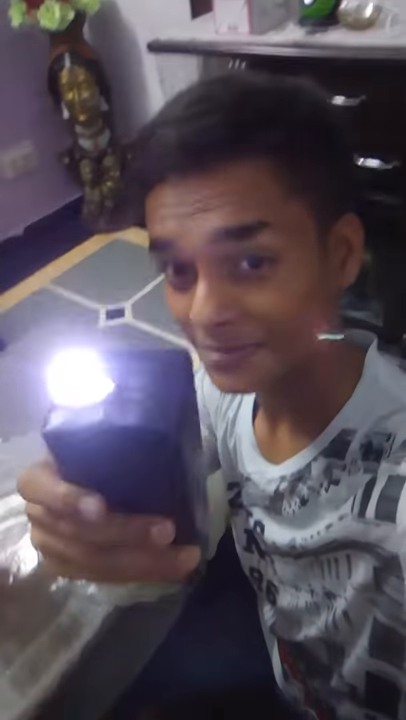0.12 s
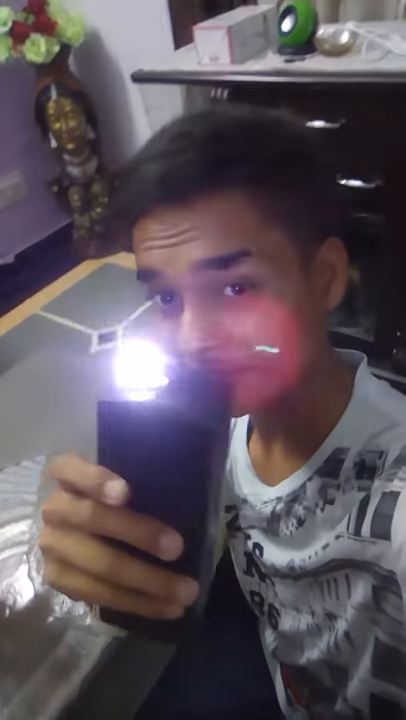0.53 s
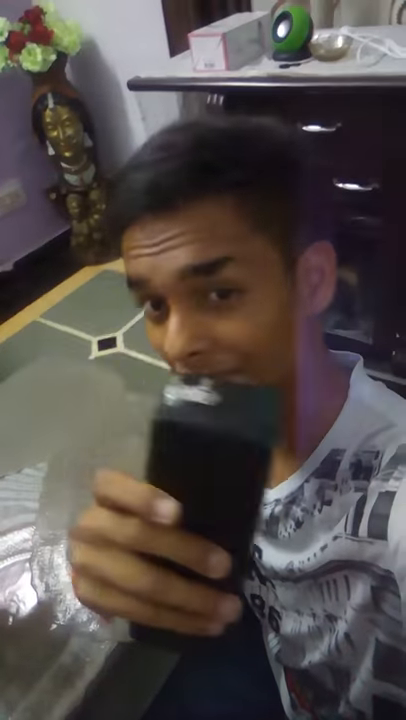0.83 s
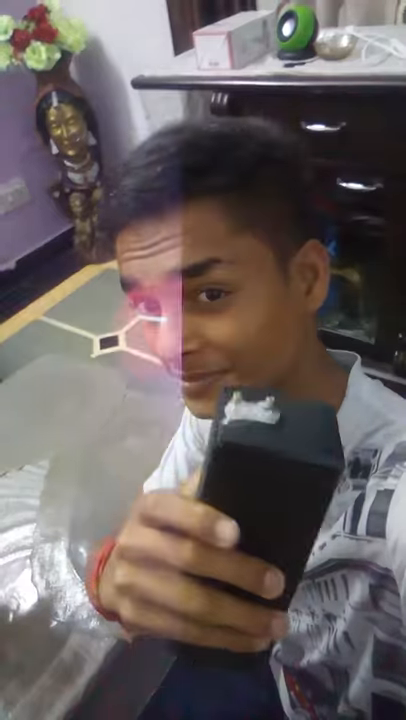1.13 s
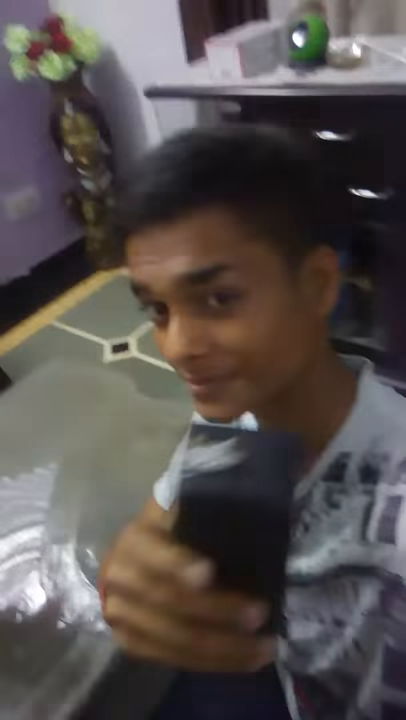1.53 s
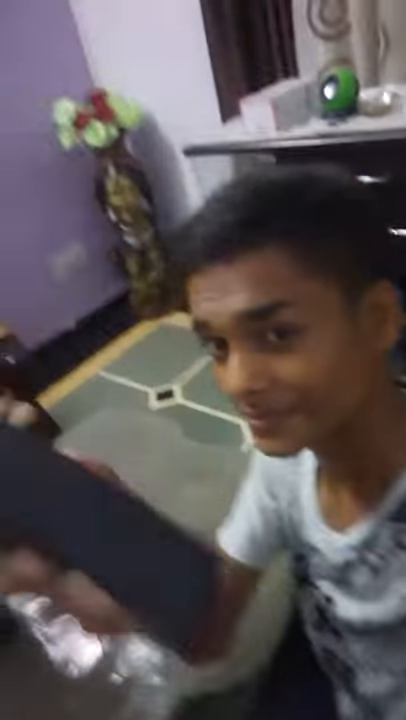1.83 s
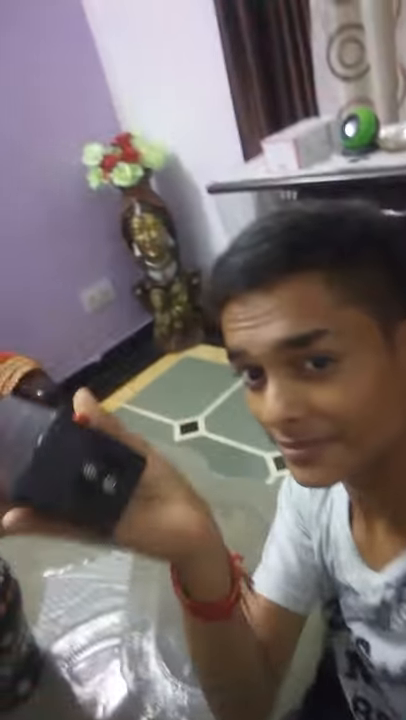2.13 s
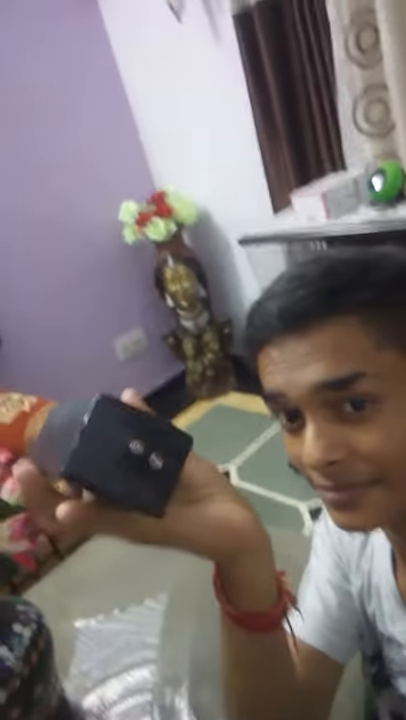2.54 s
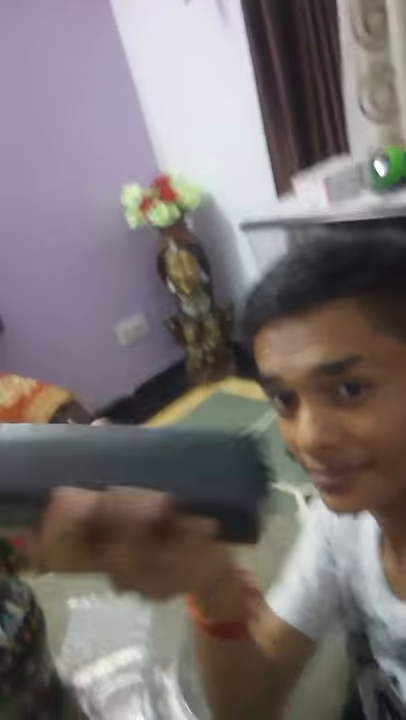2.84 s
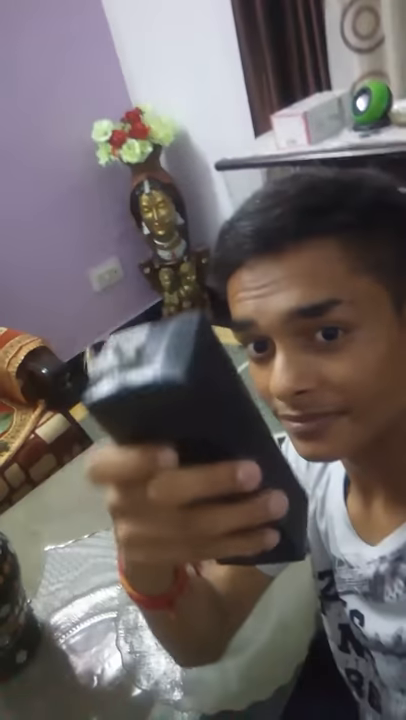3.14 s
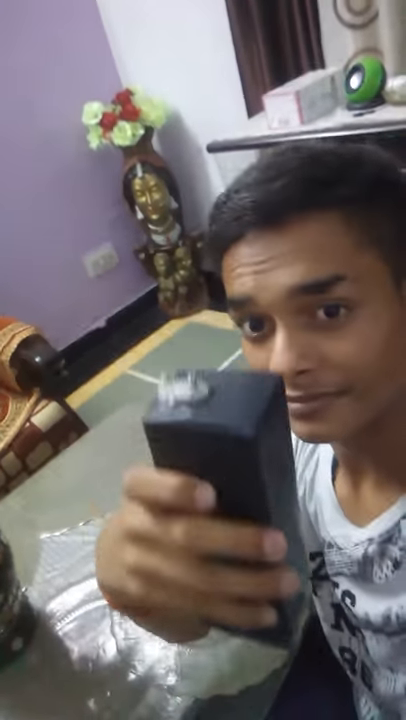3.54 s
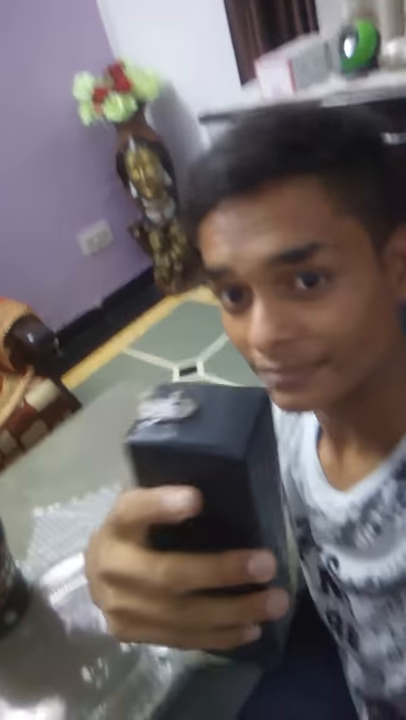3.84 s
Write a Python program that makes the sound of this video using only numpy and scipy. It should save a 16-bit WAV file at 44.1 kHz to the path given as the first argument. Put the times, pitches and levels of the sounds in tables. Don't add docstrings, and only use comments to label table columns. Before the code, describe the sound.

A stun device's electric sparks crack sharply from 0 to about 2.8 s, roughly eleven per second, uneven in strength. Very close to a stereo phone microphone, they overload it with blunt thumps and bright snaps, echoing off hard walls. The room dies away; plastic knocks and loose switch clicks come at 3.1, 3.2 and 3.3-3.4 s, then a faint rub near 3.8 s over quiet room noise.

```python
import sys
import numpy as np
from scipy import signal
from scipy.fft import rfft, irfft, next_fast_len
from scipy.io import wavfile
from scipy.ndimage import uniform_filter1d, minimum_filter1d

SR = 44100
rng = np.random.default_rng(int(sys.argv[2]) if len(sys.argv) > 2 else 0)


def to_linear_factor(level_db):
    exponent = np.asarray(level_db, float) / 20
    return 10 ** exponent


def int16_out(signal):
    q = np.round(np.clip(np.atleast_2d(signal).T, -1, 1) * 32767)
    wavfile.write(sys.argv[1], SR, q.astype(np.int16))


N = 176400

# start in seconds, level in dB, left microphone's jolt at the crack, jolt at
SPARKS_EARLY = [(-0.008, 2, 0.3, -0.19, -0.37), (0.0718, 7, 0.023, -1.53, -0.44),
                (0.1495, 4, 0.31, -0.67, 0.4), (0.2303, 4, -0.065, 0.062, -0.22),
                (0.3142, 5, 0.035, -0.62, 0.4), (0.3985, -2.5, 0.21, -0.47, 0.19),
                (0.4822, -2, 0.53, -0.75, 0.18), (0.5637, 0, 0.31, -0.34, -0.029),
                (0.6476, 3.5, 0.51, -0.44, 0.036), (0.7298, -1, 0.38, -0.47, 0.21),
                (0.8111, 2, 0.35, -1.34, 0.63), (0.89, -2.5, 0.37, -1, -1),
                (0.9688, 0.5, 0.42, -0.49, 0.97), (1.052, -3.5, 0.11, -0.34, 0.11),
                (1.1376, 0.5, 0.41, -0.65, 0.84), (1.227, 5.5, 0.54, -1.6, 0.9),
                (1.3203, 3.5, -0.19, -0.86, 0.98)]
SPARKS_LATE = [(1.411, 5.5, 0.073, -1.14, 1), (1.499, 3.5, -0.31, -1.33, 0.61),
               (1.5956, -3, 0.21, -0.69, 0.31), (1.7037, 6, 0.12, 0.21, -1.13),
               (1.7919, 3.5, 0.083, -0.83, -0.31), (1.88, 0, -0.55, -1, -0.23),
               (1.9781, 3.5, -0.23, -1.12, -0.21), (2.067, -1.5, 0.32, -0.88, 0.2),
               (2.1632, 0, -0.22, -0.83, 0.011), (2.2578, -3.5, 0.2, -0.55, -0.078),
               (2.348, -5.5, 0.063, -0.62, 0.018), (2.447, -0.5, -0.23, -0.21, 0.19),
               (2.5363, 2, -0.074, -0.51, -0.3), (2.6258, -1.5, -0.028, -0.35, -0.013),
               (2.7198, -0.5, -0.073, -0.17, -0.049), (2.8337, -0.5, -0.036, -0.55, -0.084)]
# time in seconds, echo delay in ms, crack at the right port in dB.
NEAR_WALL = [(0, 10.5, 0), (.66, 10.34, -1.5), (0.718, 8.7, 1), (1.498, 8.4, 2.5), (1.702, 8.3, -2),
             (1.89, 9.9, -9), (1.968, 8.6, -5), (2.07, 8.6, 1.5), (2.3, 8.9, 0.5), (2.6, 8.4, 1),
             (2.84, 9.4, 2.5)]
# delay in seconds, left level in dB, right level in dB.
SHARP_ECHOES = [
    (.006, -14, -5),
    (.0105, -13.5, -6),
    (.016, -3, -12.5),
]
# time in seconds, jolt as share of full scale.
EXTRA_JOLTS = [(.3147, -0.75), (.3153, 0.23), (.3996, -0.29), (1.8011, 0.64), (1.9790, 0.36),
               (2.8341, 0.34), (2.8349, -0.12), (1.3213, -0.34), (1.3217, 0.6), (2.4625, -0.15),
               (2.7353, -0.46), (1.6093, 0.48), (.0861, 0.69), (.1638, 0.89), (.2445, 0.4), (.3283, 0.47),
               (2.0665, -.6), (2.0669, 1.26), (2.0684, -1), (2.0746, 0.41), (2.0816, -0.38), (.0739, 0.6),
               (.8128, 0.34), (.8917, 0.51), (1.0537, -0.25), (1.4106, -0.94), (1.499, -0.74),
               (1.7139, 1.45), (1.7912, -0.54), (1.8813, 0.17), (1.8827, -0.2), (2.5358, -0.14),
               (2.5363, 0.44), (2.5368, -0.45), (2.6251, -0.3), (2.6259, -0.039), (2.7201, -0.53),
               (2.7209, 0.39), (.4128, 0.42), (.5723, -0.3), (.5777, 0.29), (1.4237, -.4), (2.1714, 0.4),
               (.8215, -1.1), (.8218, 1.1), (.8222, -1.2), (.8226, 1.4)]
# time in seconds, jolt as share of full scale.
RIGHT_JOLTS = [(0.1504, -0.08), (0.2309, -0.44), (0.314, -0.12), (0.4001, -0.12), (0.482, -0.14),
               (0.5647, -0.12), (0.648, -0.076), (0.7308, -0.077), (0.8105, 0.055), (0.888, -0.095),
               (0.9683, 0.14), (1.0524, 0.18), (1.1381, 0.1), (1.2277, -0.26), (1.3212, 0.2), (1.41, -0.17),
               (1.4989, -0.39), (1.5951, -0.32), (1.7037, 0.36), (1.7887, 0.028), (2.8332, 0.041)]
# frequency in Hz, level in dB.
SPARK_COLOUR = [(150, -10.5), (800, -14.5), (1800, -12.5), (4700, -4.5), (6600, -2), (7800, -9.5),
                (13500, -10), (15000, -1.5)]
# frequency in Hz, left over right in dB.
LEFT_OVER_RIGHT = [(100, 22.5), (700, 8), (2400, 2), (8000, 1.5), (15000, 5.5)]
# frequency in Hz, time to fall 60 dB in seconds.
ROOM_T60 = [(300, 0.27), (1000, 0.31), (3000, 0.5), (7000, 0.43), (15000, 0.34)]
# start in seconds, peak in dB, left over right in dB, room in dB, strongest ring in Hz.
KNOCKS = [(3.0802, -6, 7, -21.5, 2700), (3.0807, -13, 19, -40, 5370), (3.2001, -23.5, -9, -9.5, 2010),
          (3.3338, -14.5, -3.5, -16.5, 3400), (3.392, -17, 13, -42, 1750), (3.3949, -21, 11, -41, 716),
          (3.394, -4, 6, -20.5, 3390), (3.3949, -6.5, 19, -45, 3280), (3.44, -45, 5, 15, 3400),
          (3.48, -47, 5, 6, 3400), (3.732, -42, 0, -19.5, 2000)]
CLICKS = [(3.1967, -14.5, 25, -27.5, 5510), (3.197, -10.5, 25, -31, 3820), (3.2078, -20, 25, -37, 5530),
          (3.2105, -11.5, 25, -24.5, 3800), (3.21, -17, 25, -43, 5460), (3.3212, -42, 20, -40, 5500),
          (3.3236, -23.5, 20, -26, 4830), (3.3357, -19, 25, -42, 5470), (3.3388, -25, 10, -39, 5500),
          (3.3431, -12.5, 25, -32, 5700), (3.3454, -16, 25, -42, 5600), (3.35, -25, 10, -41, 4500),
          (3.3530, -14, 25, -29, 5540), (3.4035, -24, 16, -40, 4800)]
# centre in Hz, width in Hz, level in dB.
CASE = [(716, 185, -11), (1690, 540, 0), (3400, 830, 3), (5410, 700, -2), (6400, 520, 1),
        (11650, 2500, -15.5), (14660, 740, 1)]
# centre in Hz, width in Hz, level in dB.
SWITCH = [(2540, 1200, -5), (3800, 600, -3), (5400, 280, -1), (7000, 360, -8), (11200, 1700, -27),
          (15300, 630, -10)]
# frequency in Hz, level in dB.
KNOCK_ROOM = [(300, -31), (700, -10.5), (1600, -7), (3500, -2.5), (6500, -6.5), (8000, -19.5),
              (13500, -17.5), (15000, -8)]
# time in seconds, level in dB.
RUB_SWELL = [
    (3.70, -91.5),
    (3.765, -70),
    (3.791, -63),
    (3.825, -64.5),
    (3.845, -66),
    (3.95, -82),
]
# frequency in Hz, level in dB.
RUB_COLOUR = [(200, -15), (820, -7), (1500, -10), (3000, -10), (6000, -8), (9000, -23.5), (15000, -11.5)]
# centre in Hz, width in Hz, level over the swell in dB.
HUM = [(328, 43, -82.5), (815, 22, -75.5)]
# frequency in Hz, level per Hz in dB.
FLOOR_COLOUR = [(24, -43), (40, -14), (204, -12.5), (237, -11), (516, -9), (680, -15.5), (790, -3),
                (990, -9.5), (16000, -28.5)]

CRACK_DB, CRACK_PAN_DB, CRACK_T60, CRACK_LEAD_S = 10.5, 2, 0.018, 0.00022
WALL_DB = -18.5
SNAP_HZ, SNAP_WIDTH_HZ, SNAP_DB = 1580, 1260, 6
FIZZ_HZ, FIZZ_WIDTH_HZ, FIZZ_DB = 15400, 3000, 8
JOLT_LAG_S, FLIP_S, FLOP_S, REBOUND_S = 0.0003, 0.00036, 0.0011, 0.00156
JOLT_DB, JOLT_RIGHT_DB = 19.5, 1.5
SWING_HZ, SWING_DAMP, JOLT_TOP_HZ, JOLT_LOW_HZ = 96, 0.65, 3780, 48.3
EARLY_DB, EARLY_T60, LATE_DB = 5, 1, 6
BUILD_S = np.array([[0.0056], [0.0094]])
SPIKY, SPIKY_T60, PATCHY_DB, RIGHT_T60_SHARE = 0.81, 0.18, 2.5, 0.92
TAIL_LOW_HZ = 895
KNOCK_T60, KNOCK_RISE_S, KNOCK_BLOW = 0.005, 0.0005, 2
RING_DB, RING_WIDTH_HZ = 4, 370
SHADOW_HZ = 3500
KNOCK_FADE_DB_PER_S = 66
FLOOR_DB, FLOOR_SIDE_DB = -64, -60.5
MIC_TOP_HZ, MIC_EDGE_HZ = 15680, 45
DUCK_FROM_DB, DUCK_SLOPE, RECOVER_DB_PER_S, HOLD_S, AHEAD_S = -7, 0.83, 150.5, 0.048, 0.003
GATE_FROM_DB, GATE_SLOPE, GATE_MOST_DB, GATE_S = -46.5, 1.04, 8, 0.016
CLIP_HARD = 7


def unit(x):
    return x / np.sqrt(np.mean(x ** 2) + 1e-20)


def along(points, hz):
    f, v = np.transpose(points)
    return np.interp(np.log(hz + 1), np.log(f + 1), v)


def filtered(x, response):
    m = next_fast_len(x.shape[-1] + 8192)
    spectrum = rfft(x, m) * response(np.fft.rfftfreq(m, 1 / SR))
    return irfft(spectrum, m)[..., :x.shape[-1]]


def highpass(f, corner_hz):
    return 1j * f / (corner_hz + 1j * f)


def peaks(table):
    def response(f):
        total = 0
        for k, (centre, width, db) in enumerate(table):
            ring = 1j * f * width / (centre * centre - f * f + 1j * f * width)
            total = total + (-1) ** k * to_linear_factor(db) * ring
        return total
    return response


def add(out, x, s):
    i = round(s * SR)
    out[..., max(i, 0):max(i + x.shape[-1], 0)] += x[..., max(-i, 0):N - i]


def add_jolt(out, size, s):
    add(out, np.array([size]), s)


def tails(count):
    hz, t, z = signal.stft(rng.standard_normal((count, 2, SR // 2)), SR, nperseg=512)
    patches = uniform_filter1d(rng.standard_normal(z.shape), size=2, axis=-2)
    patches = unit(uniform_filter1d(patches, size=9, axis=-1))
    t60 = along(ROOM_T60, hz)[:, None] * np.array([1, RIGHT_T60_SHARE])[:, None, None]
    decaying = z * to_linear_factor(PATCHY_DB * patches - 60 * t / t60)
    tail = signal.istft(decaying, SR, nperseg=512)[1][..., :SR // 2]
    t = np.arange(SR // 2) / SR
    depth = SPIKY * to_linear_factor(-60 * t / SPIKY_T60)
    grain = unit(uniform_filter1d(rng.standard_normal(tail.shape), size=9))
    build = 1 - np.exp(-(t / BUILD_S) ** 2)
    return tail * np.exp(depth * grain - depth ** 2) * build, t


def membrane_swing(f):
    swing = 1j * f / (SWING_HZ ** 2 - f * f + 2j * SWING_DAMP * f * SWING_HZ) * SR / (2 * np.pi)
    return swing / (1 + 1j * f / JOLT_TOP_HZ) * highpass(f, JOLT_LOW_HZ)


def jolts(wall_times):
    steps = np.zeros((2, N))
    for (s, _, first, second, rebound), wall in zip(SPARKS_EARLY + SPARKS_LATE, wall_times):
        jolt = s + JOLT_LAG_S
        add_jolt(steps[0], 0.92 * first, jolt)
        add_jolt(steps[0], -1.5 * first, jolt + FLIP_S)
        add_jolt(steps[0], 0.5 * first, jolt + FLOP_S)
        add_jolt(steps[0], second, wall)
        add_jolt(steps[0], rebound, wall + REBOUND_S)
    for port, table in enumerate([EXTRA_JOLTS, RIGHT_JOLTS]):
        for at, size in table:
            add_jolt(steps[port], size, at)
    return to_linear_factor([[JOLT_DB], [JOLT_DB + JOLT_RIGHT_DB]]) * filtered(steps, membrane_swing)


def sparks():
    rows = SPARKS_EARLY + SPARKS_LATE
    tail, t = tails(count=len(rows))
    tail = tail * (to_linear_factor(LATE_DB) + to_linear_factor(EARLY_DB - 60 * t / EARLY_T60))
    air, near = np.zeros((2, N)), np.zeros((2, N))
    tb = t[:SR // 50]
    when, delay_ms, facing_db = np.transpose(NEAR_WALL)
    wall_times = [row[0] + np.interp(row[0], when, delay_ms) / 1000 for row in rows]
    for (s, db, *_), wall, room in zip(rows, wall_times, tail):
        burst = rng.standard_normal((5, 2, len(tb))) * to_linear_factor(db + CRACK_DB - 60 * tb / CRACK_T60)
        luck = rng.standard_normal(6)
        right_db = np.interp(s, when, facing_db) + 0.43 * luck[0]
        add(air, to_linear_factor(db) * room, s)
        add(near, burst[0] * to_linear_factor([[CRACK_PAN_DB], [right_db]]), s - CRACK_LEAD_S)
        add(near, burst[1] * to_linear_factor([[WALL_DB], [WALL_DB - 21.5]]), wall)
        for k, (lag, echo_left_db, echo_right_db) in enumerate(SHARP_ECHOES):
            level = to_linear_factor([[echo_left_db], [echo_right_db]] + 0.56 * luck[1 + k])
            add(air, burst[2 + k] * level * to_linear_factor(-40 * tb / CRACK_T60), s + lag)

    def colour(hz):
        return to_linear_factor(along(SPARK_COLOUR, hz) + np.outer([0.5, -0.5], along(LEFT_OVER_RIGHT, hz)))

    body = peaks([(SNAP_HZ, SNAP_WIDTH_HZ, SNAP_DB), (FIZZ_HZ, FIZZ_WIDTH_HZ, FIZZ_DB)])
    air = filtered(air, lambda f: highpass(f, TAIL_LOW_HZ))
    near = filtered(near, lambda f: 1 + body(f))
    return filtered(air + near, colour) + jolts(wall_times)


def knocks():
    rows = [(row, CASE) for row in KNOCKS] + [(row, SWITCH) for row in CLICKS]
    tail, t = tails(count=len(rows))
    out, wet = np.zeros((2, N)), np.zeros((2, N))
    tb = t[:SR // 50]
    for ((s, db, pan_db, room_db, ring_hz), body), room in zip(rows, tail):
        rise = 1 - np.exp(-(tb / KNOCK_RISE_S) ** 2)
        burst = rng.standard_normal(len(tb)) * to_linear_factor(-60 * tb / KNOCK_T60) * rise
        burst[round(KNOCK_RISE_S * SR)] += KNOCK_BLOW

        def at_ports(f):
            ring = peaks(body)(f) + peaks([(ring_hz, RING_WIDTH_HZ, RING_DB)])(f)
            shadowed = to_linear_factor(-pan_db) / (1 + 1j * f / SHADOW_HZ) ** 2
            return ring * np.array([1 + 0 * f, shadowed])

        add(out, to_linear_factor(db + 8) * filtered(burst, at_ports), s)
        fade = to_linear_factor(db + room_db + 5 - KNOCK_FADE_DB_PER_S * t)
        add(wet, fade * room * to_linear_factor([[1.5], [-1.5]]), s)
    return out + filtered(wet, lambda hz: to_linear_factor(along(KNOCK_ROOM, hz)))


def rub():
    swell_db = np.interp(np.arange(N) / SR, *np.transpose(RUB_SWELL))
    hiss = unit(filtered(rng.standard_normal((2, N)), lambda hz: to_linear_factor(along(RUB_COLOUR, hz))))
    hum = np.zeros(N)
    for centre, width, db in HUM:
        tone = filtered(rng.standard_normal(N), lambda f: peaks([(centre, width, 0)])(f) ** 2)
        hum += to_linear_factor(db + 72.5) * unit(tone)
    return to_linear_factor(swell_db + 4) * (hiss + hum) * to_linear_factor([[3], [-3]])


def floor():
    def colour(hz):
        return to_linear_factor(along(FLOOR_COLOUR, hz))

    a, b = filtered(rng.standard_normal((2, N)), colour)
    low = filtered(rng.standard_normal(N), lambda hz: colour(hz) / (1 + (hz / 600) ** 2))
    mid = to_linear_factor(FLOOR_DB) * unit(a)
    side = to_linear_factor(FLOOR_DB) * unit(b) + to_linear_factor(FLOOR_SIDE_DB) * unit(low)
    return np.array([mid + side, mid - side]) * to_linear_factor([[2], [-2]])


def scene():
    return sparks() + knocks() + rub() + floor()


def gain_control_db(level_db):
    ramp = RECOVER_DB_PER_S * np.arange(N) / SR
    ahead = max(round(AHEAD_S * SR), 2)
    hold = max(round(HOLD_S * SR), ahead + 4)
    wanted = DUCK_SLOPE * np.maximum(level_db - DUCK_FROM_DB, 0)
    need = -minimum_filter1d(-wanted, ahead + hold, origin=(hold - ahead) // 2 - 1)
    return uniform_filter1d(np.maximum.accumulate(need + ramp) - ramp, ahead // 2)


def noise_gate_db(level_db):
    slow_db = uniform_filter1d(level_db, max(round(GATE_S * SR), 1))
    return np.clip(GATE_SLOPE * (GATE_FROM_DB - slow_db), 0, GATE_MOST_DB)


def roll_off(x):
    return signal.sosfilt(signal.butter(12, 16830, fs=SR, output="sos"), x)


def record(dry):
    mic = filtered(dry, lambda f: 1 / (1 + np.exp(np.clip((f - MIC_TOP_HZ) / MIC_EDGE_HZ, -50, 9))))
    treble = filtered(mic, lambda f: highpass(f, 800) ** 2)
    power = np.abs(uniform_filter1d((treble ** 2).max(0), size=45))
    level_db = 10 * np.log10(power + 1e-12) + 6
    x = mic * to_linear_factor(-gain_control_db(level_db) - noise_gate_db(level_db))
    mix = x / (1 + np.abs(x) ** CLIP_HARD) ** (1 / CLIP_HARD)
    return roll_off(mix)


dry = scene()
out = record(dry)
int16_out(out)
```